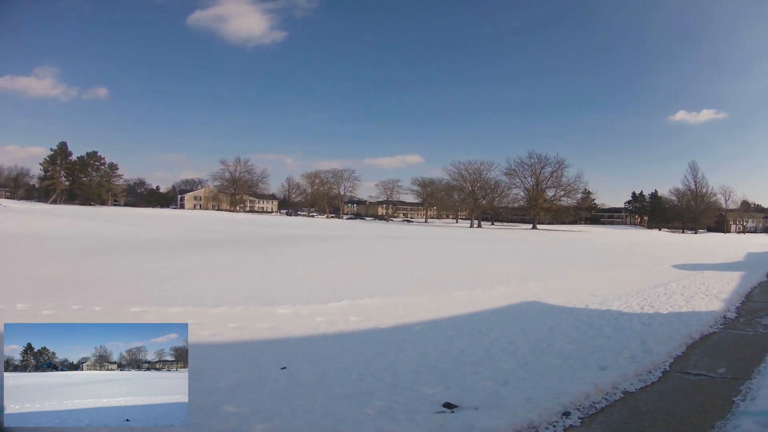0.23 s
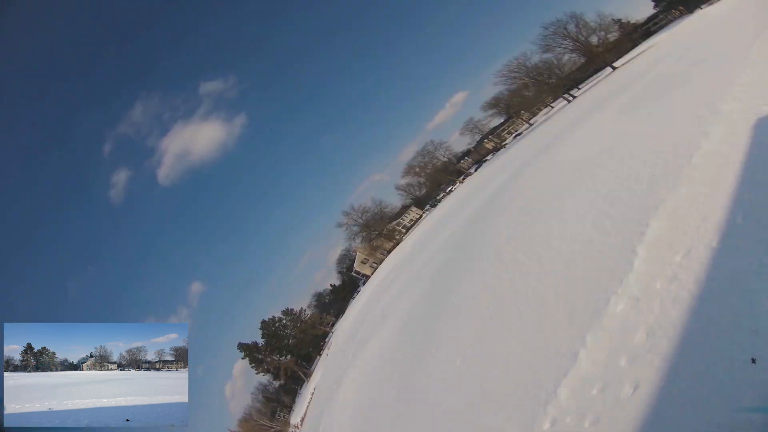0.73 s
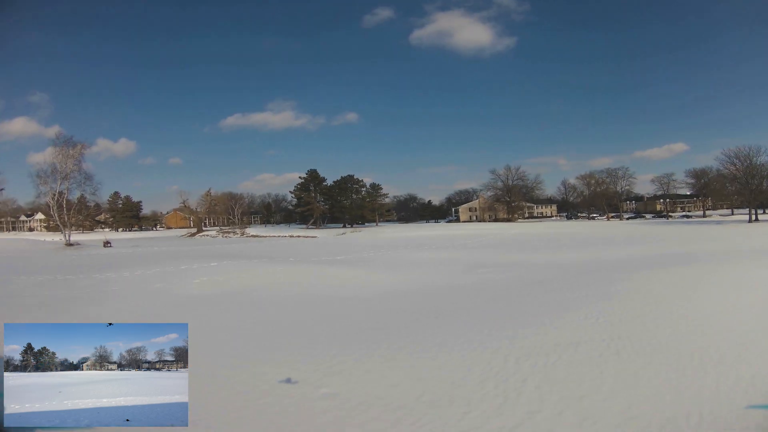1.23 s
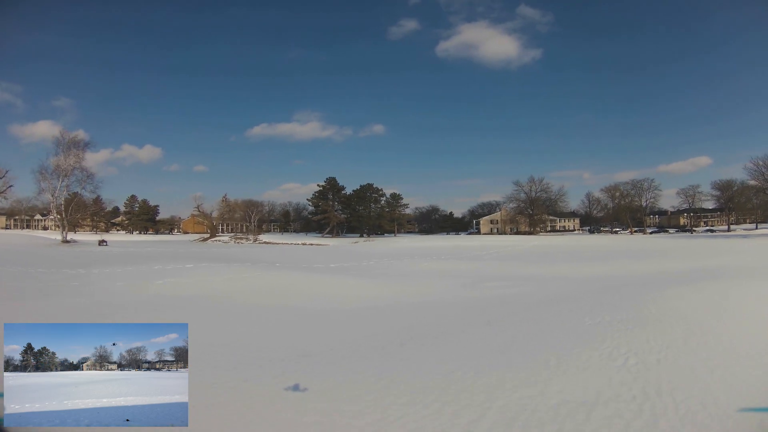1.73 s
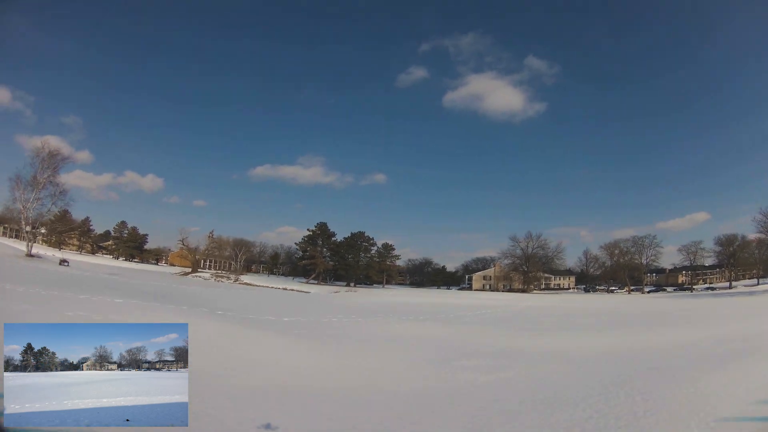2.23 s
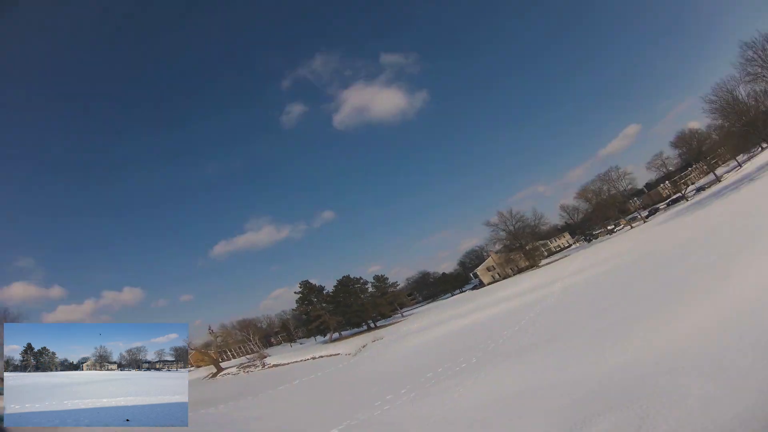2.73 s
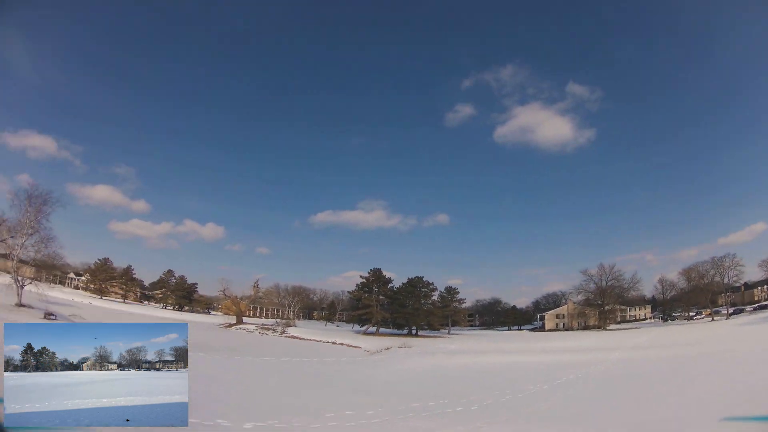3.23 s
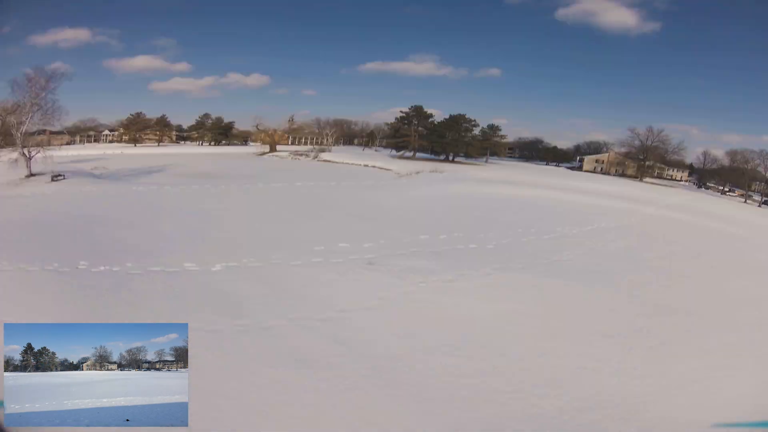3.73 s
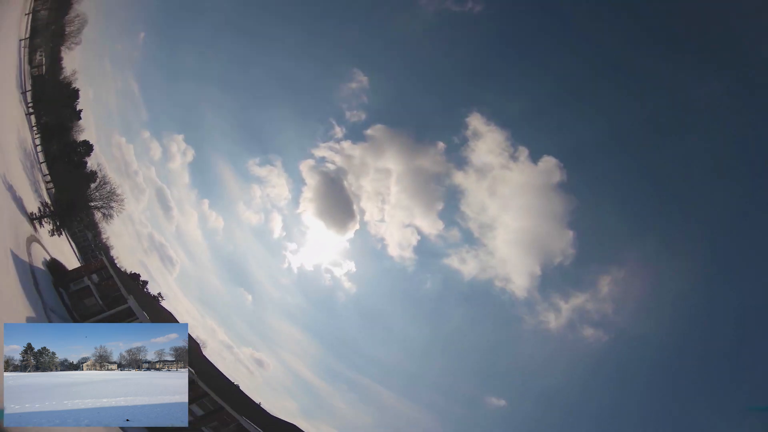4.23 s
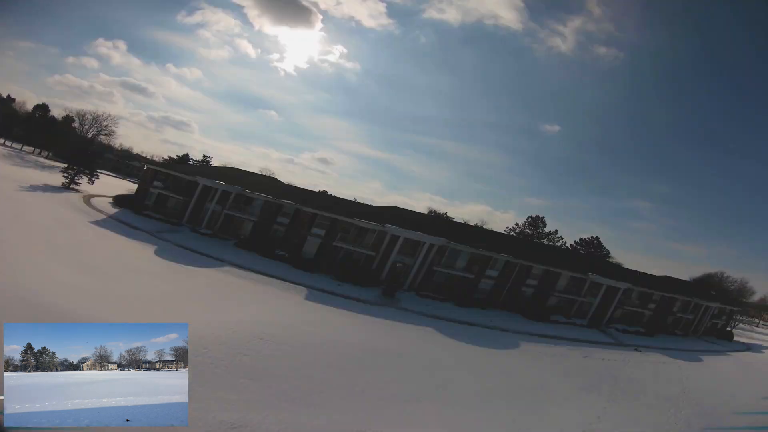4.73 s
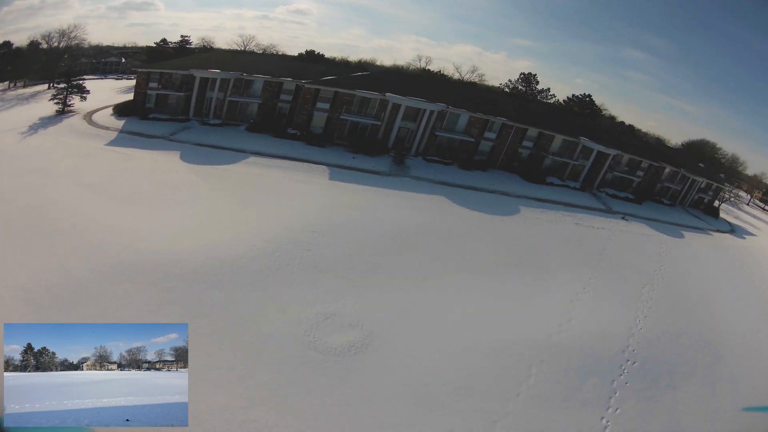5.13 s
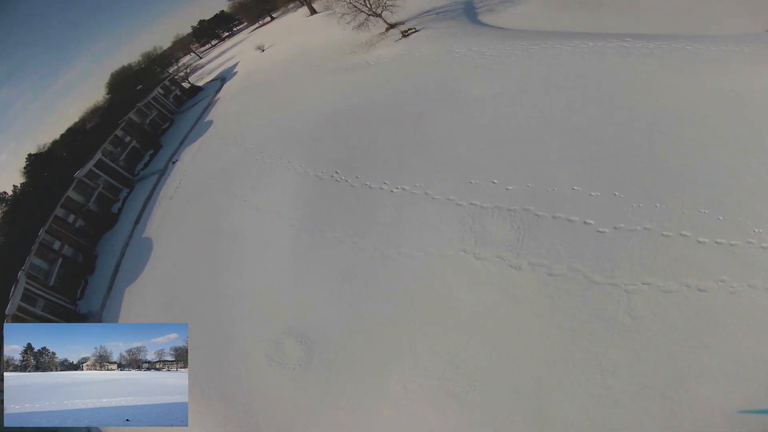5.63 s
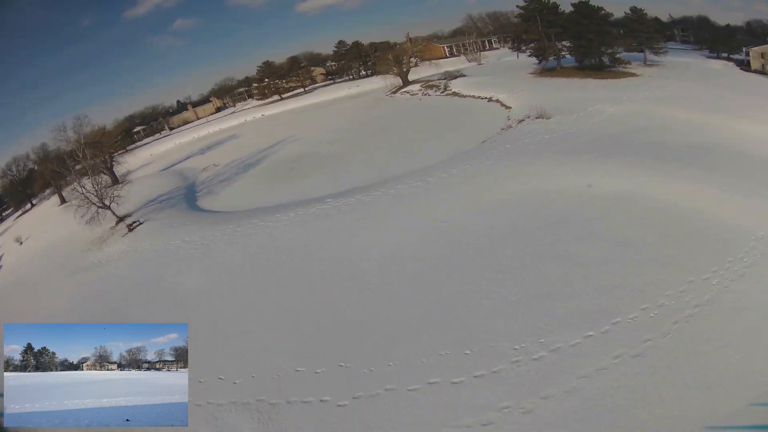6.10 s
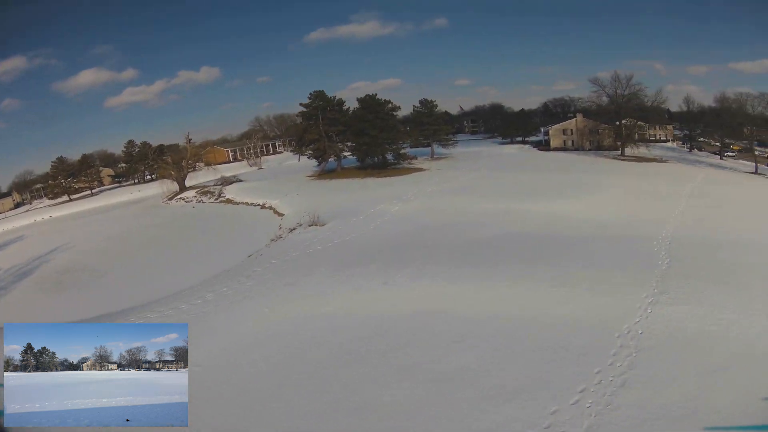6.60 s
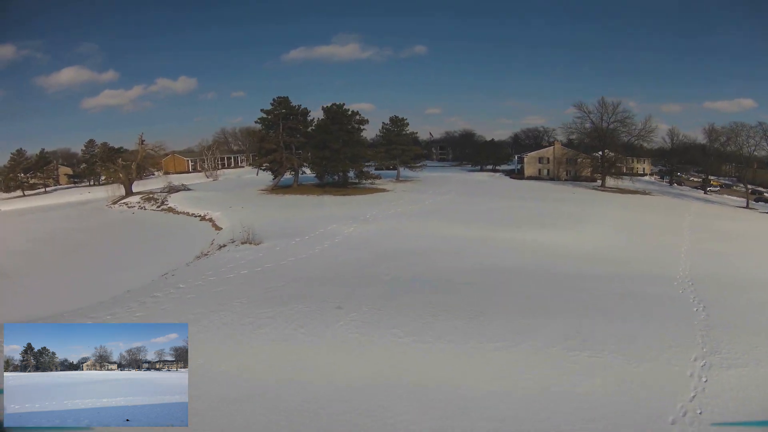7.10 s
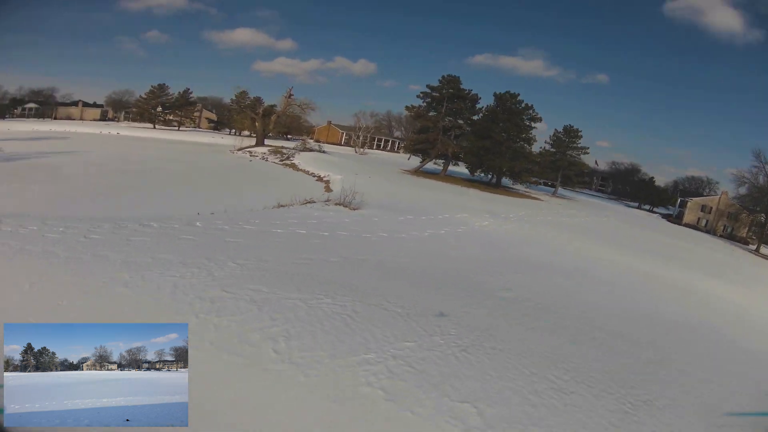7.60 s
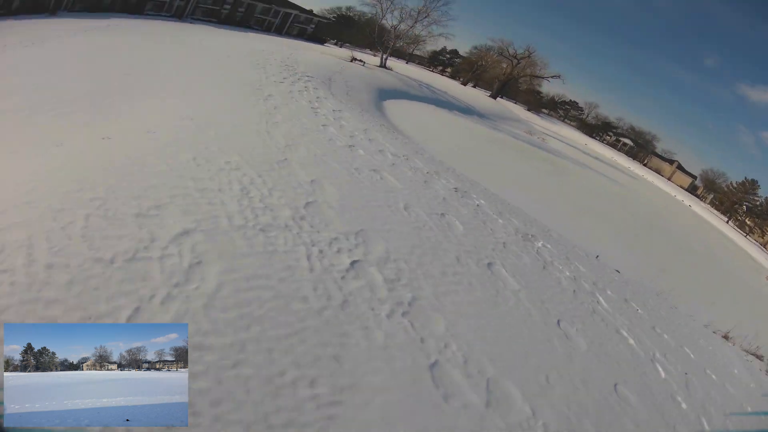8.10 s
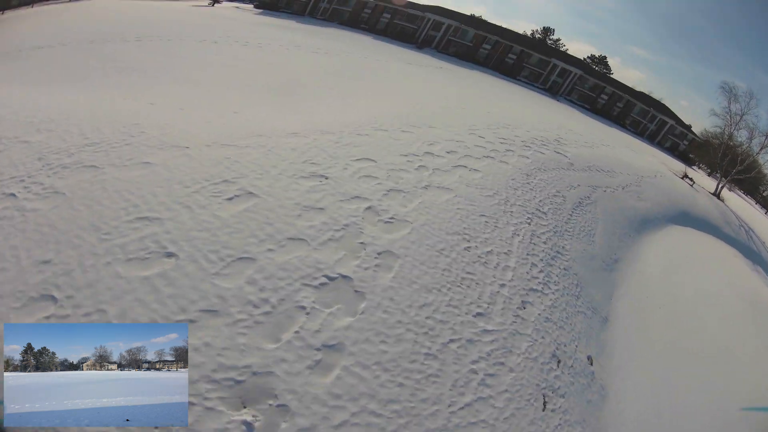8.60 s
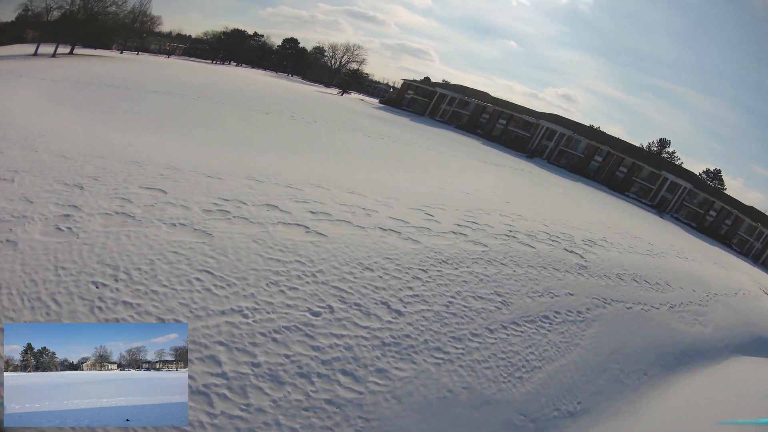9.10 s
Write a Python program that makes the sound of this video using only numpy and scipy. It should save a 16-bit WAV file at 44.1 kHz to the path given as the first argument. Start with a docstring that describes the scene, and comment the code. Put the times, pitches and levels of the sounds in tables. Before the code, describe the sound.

A small racing quadcopter whines and screams in punched throttle bursts over a snowy field, dropping to faint whistling idle between pushes as it flies off.

```python
"""A small racing quadcopter flies over a snowy field, heard from the ground where it took off.
From the start, over a low outdoor wash, four three-blade propellers whine and beat as harmonic series.
The throttle is punched and cut; between punches the idling motors whistle by magnetic pull on their bells.
From 1.3 s brief jabs screech as bell-coloured noise. Near 7 s a far bird chirps in arched pitch glides.
A last long push rises and falls to the end; scattered echoes follow the craft and the bird."""
import sys
import numpy as np
from scipy import signal
from scipy.fft import rfft, irfft, next_fast_len
from scipy.io import wavfile
from scipy.ndimage import uniform_filter1d, map_coordinates

SR = 44100
rng = np.random.default_rng(int(sys.argv[2]) if len(sys.argv) > 2 else 0)


def log_audio(samples):
    """Write samples as a 16-bit WAV file to the path given in sys.argv[1]."""
    # one column per channel
    frames = np.atleast_2d(samples).T
    # limit to full scale, then quantise
    limited = np.clip(frames, -1, 1)
    pcm = np.round(limited * 32767).astype(np.int16)
    wavfile.write(sys.argv[1], SR, pcm)


N = 412323
T = np.arange(N) / SR
FREQS = np.fft.rfftfreq(N, 1 / SR)

IDLE_HZ, LIFT_HZ = 369, 484.7  # blade-passing pitch at idle, and where the blades begin to carry the craft
IDLE_SPREAD = .18  # speed difference between the motors at idle, as a share
# the four motors: place_in_speed_spread, relative_level_db
MOTOR_OFFSETS = [(-1.05, -3.5), (-0.6, -2), (.55, 1.5), (.9, -1)]
# tilt of the propellers beams their sound:
# time_s, blade_tone_db, buzz_db, second_to_first_harmonic_db, higher_overtones_db
TILT_BEAM = [(0, 0.5, -3, -5, -2), (.5, -4, -4.5, -4, 4), (.68, 0, 1.5, 11, -3.5), (.92, 1.5, 0, 1, 1.5),
             (1.02, -1.5, -4.5, 3.5, -3.5), (1.8, -2, 0.5, -0.5, 0), (2.25, -1, -1, -5, -1),
             (2.47, 4, 2, 4.5, -0.5), (3.7, -0.5, -2.5, -3.5, -2), (4, 3.5, 1, 9, -2.5),
             (4.95, 2.5, 1, 2.5, -2.5), (5.15, -1, -6.5, 9.5, -1.5), (6.4, 0, 3, 1, -2),
             (6.8, 2, 1.5, 1, -5), (8.1, 7.5, 0, 0, -1), (8.5, -4, 3.5, -7, -10.5), (8.75, 4.5, 5, 7, -13),
             (9.05, 14.5, 2, 9.5, -6), (9.35, 14, -1.5, 10.5, -4.5)]
# motor jabs that start or stop a flip; levels are those before the attack and decay shape:
# start_s, pitch_gain_hz, screech_db, blade_bite_db, rise_s, decay_s
FLIP_JABS = [(1.296, 249.4, -42.5, -40, 0.0025, 0.037), (2.62, 451.4, -43.5, -46, .002, .011),
             (2.921, 230.3, -40, -41.5, 0.0028, .011), (3.009, 89.96, -63, -62.5, 0.0095, .05),
             (4.254, 451.1, -52, -30.5, .009, .032), (4.439, 50.07, -56.5, -65.5, 0.0057, .035),
             (5.645, 100, -66, -53, 0.0097, 0.059), (5.835, 30.35, -61.5, -73, 0.0055, 0.023)]


def amp(db):
    """Level law: decibels to amplitude gain."""
    return 10 ** (np.asarray(db) / 20)


def unit(x):
    """Normalisation by mean power: scales to rms 1."""
    return x / np.sqrt(np.mean(x ** 2) + 1e-20)


def follow(rows):
    """Linear interpolation in time: the columns of a curve table at every sample."""
    s, *columns = np.transpose(rows)
    return [np.interp(T, s, column) for column in columns]


def across(points):
    """Interpolation over log frequency: a spectral table at every bin."""
    hz, value = np.transpose(points)
    return np.interp(np.log(FREQS + 1), np.log(hz), value)


def drift(rate_hz):
    """Low-pass filtered noise: a smooth random curve of rms 1, up to about the given rate."""
    size = next_fast_len(N)
    hz = np.fft.rfftfreq(size, 1 / SR)
    spectrum = rfft(rng.standard_normal(size)) / (1 + (hz / rate_hz) ** 4)
    return unit(irfft(spectrum, size)[:N])


def noise_pair(spectrum, same):
    """Partial coherence: coloured noise at two microphones with the given correlation."""
    a, b = rfft(rng.standard_normal((2, N)))
    same = np.clip(same, -1, 1)
    pair = np.array([a, same * a + np.sqrt(1 - same ** 2) * b])
    return unit(irfft(pair * amp(across(spectrum)), N))


def load(hz):
    """Motor loading: 0 in cruise, 1 at full throttle."""
    return np.clip((hz - 930) / 200, 0, 1)


def wash(level_db=-56.5, swell_db=0.83, swell_hz=4, rumble_hz=110):
    """Partly coherent ambient noise: distant traffic, and a low rumble that comes and goes with the wind."""
    # spectral shape: frequency_hz, density_db
    wash_spectrum = [(15, -28), (25, 0.5), (71, 5.5), (158, -9.5), (202, -18.5), (286, -11.5), (438, -19.5),
                     (700, -13), (1150, -16.5), (1460, -27), (2500, -30), (3540, -41), (5720, -32),
                     (15000, -79.5)]
    # traffic lies to one side; a negative likeness means opposite phase: frequency_hz, left_right_likeness
    wash_likeness = [(30, .42), (70, .52), (130, .92), (300, .75), (500, -.25), (900, -.68), (1150, -.5),
                     (1500, .1), (2200, .35), (12000, .35)]
    # wind on the microphones: time_s, rumble_gain_db
    wind_curve = [(0, 4), (.7, -0.5), (1.3, 3), (2.2, 0.5), (2.65, 9), (3, -4), (4.5, -3), (5.7, -2),
                  (7, -2), (9.35, 2.5)]
    air = noise_pair(wash_spectrum, across(wash_likeness)) * amp(level_db + swell_db * drift(swell_hz))
    rumble = irfft(rfft(air) / (1 + (FREQS / rumble_hz) ** 4), N)
    return air + rumble * (amp(follow(wind_curve)[0]) - 1)


def throttle(slew_s=.016, brake_s=.026):
    """Rotor inertia and braking: smoothed blade pitch and motor speed difference, in pushes and at idle."""
    # one short curve a push, cut after its last point: time_s, blade_passing_hz
    push_curves = [
        [(0, 556.9), (.47, 507.6), (.55, 540.5), (.62, 610), (.8, 661.7), (.87, 738.8), (.925, 923),
         (.97, 1197), (1.005, 1188)],
        [(1.5, 390.5), (1.65, 508.4), (1.8, 597.9), (1.95, 508.8), (2.1, 448.6)],
        [(2.1, 448.2), (2.25, 575), (2.32, 800), (2.4, 1023), (2.5, 1115), (2.55, 1064), (2.577, 883)],
        [(3.5, 399.2), (3.7, 663.2), (3.85, 888), (4, 1090), (4.068, 1198)],
        [(4.76, 416.6), (4.82, 713), (4.87, 1060), (4.93, 1203), (5.1, 845), (5.2, 705), (5.3, 459.6)],
        [(6, 396.8), (6.15, 607), (6.35, 680.2), (6.6, 659.4), (6.8, 625.6), (7, 477.3), (7.6, 448.7)],
        [(7.6, 450), (7.9, 621), (8.12, 783), (8.3, 916.3), (8.5, 974.6), (8.62, 951.5), (8.75, 816.7),
         (9, 660), (9.35, 585)],
    ]
    # one value a push: speed_difference_share
    push_spreads = [.078, .052, .033, .08, .07, .04, .06]
    hz, spread = np.full(N, float(IDLE_HZ)), np.full(N, float(IDLE_SPREAD))
    for push, share in zip(push_curves, push_spreads):
        start, cut = push[0][0], push[-1][0]
        extra_hz = follow(push)[0] - IDLE_HZ
        outside_s = np.maximum(start - T, 0) + np.maximum(T - cut, 0)
        held = np.exp(-outside_s / brake_s)
        hz = np.maximum(hz, IDLE_HZ + extra_hz * held)
        lift = np.clip(extra_hz / (LIFT_HZ - IDLE_HZ), 0, 1) * held
        spread = np.minimum(spread, IDLE_SPREAD + (share - IDLE_SPREAD) * lift)
    return [uniform_filter1d(curve, max(round(slew_s * SR), 1)) for curve in (hz, spread)]


def motor_pitches(hz, spread, wander=.35, wander_hz=3.5, flutter_hz=35):
    """Detuning makes beats: each motor has its own speed, trimmed all the time to keep the craft level."""
    flutter = .002 + .5 * spread ** 2
    pitches = []
    for offset, _ in MOTOR_OFFSETS:
        detune = spread * (offset + wander * drift(wander_hz))
        pitches.append(hz * (1 + detune + flutter * drift(flutter_hz)))
    return pitches


def levels(hz):
    """Source strength, distance and directivity: tone, buzz and hiss levels in dB, before the mix gains."""
    # loudness grows with speed: blade_passing_hz, blade_tone_db, overtone_buzz_db, tip_hiss_db
    speed_loudness = [(363, -60, -59, -45), (452, -45.5, -43, -39), (642, -38, -35, -33),
                      (810, -33.5, -27, -31), (1010, -20.5, -24, -29), (1265, -18, -16.5, -15)]
    # the craft flies off and comes partly back: time_s, distance_gain_db
    distance_gain = [(0, 1.5), (.55, -1), (1, -4), (1.2, -12), (1.8, -11), (2.2, -13.5), (2.5, -15),
                     (2.85, -18), (3.35, -26.5), (3.75, -22), (4.65, -24.5), (4.9, -20), (5.5, -29.5),
                     (6, -34), (6.4, -23.5), (7.1, -32), (7.75, -33.5), (8.22, -29), (8.5, -20.5),
                     (9.05, -24.5), (9.35, -26.5)]
    speeds, *laws = np.transpose(speed_loudness)
    near_db = follow(distance_gain)[0]
    tone_beam, buzz_beam = follow(TILT_BEAM)[:2]
    tone, buzz, hiss = (np.interp(hz, speeds, law) + near_db for law in laws)
    return tone + tone_beam, buzz + buzz_beam, hiss


def propeller(hz, db, second, upper, slope=0.59, shaft_db=-25, shake_db=-25,
              beat_db=2.5, beat_hz=14, split_hz=1400):
    """Blade-passing harmonics, shared between low tone and buzz, with weak shaft orders from imbalance."""
    fade_db, fade_hz, roll_hz = 4, 3.5, 7500
    angle = 2 * np.pi * (np.cumsum(hz) / SR + rng.random())
    shaft_angle = angle / 3  # three blades pass in each turn

    # the second harmonic belongs to the tone below split_hz and to the buzz above it
    low = 1 / (1 + (2 * hz / split_hz) ** 24)
    second_low, second_high = second * low, second * (1 - low)
    tone = (np.sin(angle) + second_low * np.sin(2 * angle)) / np.sqrt(1 + second_low ** 2)
    # at full speed the unbalanced propeller shakes the frame
    tone += amp(shake_db) * load(hz) * np.sin(shaft_angle)

    # overtones swell and fade at different times as the craft turns
    fade = unit(amp(fade_db * drift(fade_hz)))
    roll = (hz / roll_hz) ** 8
    buzz = second_high * np.sin(2 * angle) / 2
    for k in range(3, 8):
        gain = upper * k ** -slope / (1 + k ** 8 * roll)
        overtone = np.sin(k * angle + 2 * np.pi * rng.random())
        buzz += gain * np.roll(fade, rng.integers(N)) * overtone
    shaft = sum(np.sin(k * shaft_angle + 2 * np.pi * rng.random()) for k in (4, 5, 7, 8, 10))
    buzz = (buzz + amp(shaft_db) * shaft) / np.sqrt(1 + second_high ** 2)

    swell = amp(db + beat_db * drift(beat_hz))
    return tone * swell, buzz * swell[::-1], np.cos(angle)  # reversed, so that tone and buzz swell apart


def blade_wake(speed_hz, clean_rise=1.2):
    """Turbulent wake noise: its share of the buzz level falls as the blades speed up."""
    # spectral shape: frequency_hz, density_db
    wake_spectrum = [(100, -31), (300, -10.5), (800, -46.5), (1100, -5), (1500, 4.5), (2200, -1),
                     (3300, 5.5), (4300, -2), (6500, -62), (9000, -17)]
    cleaner = (np.maximum(speed_hz, LIFT_HZ) / 600) ** -clean_rise
    return noise_pair(wake_spectrum, same=0.15) * cleaner


def thinned(hiss, hiss_db, full_db=-50, loss=0.7, split_hz=8600):
    """Level-dependent treble: the quieter the hiss below full_db, the duller it sounds above split_hz."""
    top = irfft(rfft(hiss) / (1 + (split_hz / (FREQS + 1)) ** 16), N)
    return hiss + top * (amp(loss * np.minimum(hiss_db - full_db, 0)) - 1)


def tip_hiss(hz, heard_db, idle_dull_db=-7.5):
    """Tip turbulence: broadband noise that sounds duller at the top when it is quiet or the motors idle."""
    # spectral shape: frequency_hz, density_db
    tip_spectrum = [(1500, -17.5), (3200, -16.5), (4500, -0.5), (6000, 3), (7900, 4.5), (8700, -17.5),
                    (9700, -14.5), (11500, -5), (13500, 0), (16800, -4.5)]
    dull_db = idle_dull_db * np.clip((LIFT_HZ - hz) / (LIFT_HZ - IDLE_HZ), 0, 1)
    return thinned(noise_pair(tip_spectrum, same=0.41), heard_db + dull_db)


def bell(hz, between_db=-20):
    """Resonance curves: gain of the motor bell over frequency, above a floor."""
    # centre_hz, width_hz, peak_db
    bell_modes = [(4500, 400, 0), (5750, 450, 0), (7650, 500, 1)]
    return amp(between_db) + sum(amp(db) / (1 + (2 * (hz - f) / width) ** 2) for f, width, db in bell_modes)


def whistle(hz, load_db=17):
    """Magnetic pull on the motor bell: lines that flare in its resonances, and harder under load."""
    # 14 poles and 42 commutations a turn: multiple_of_shaft_speed, relative_level_db
    magnet_orders = [(14, 0), (42, -1), (84, -8)]
    shaft_hz = hz / 3
    angle, out = 2 * np.pi * np.cumsum(shaft_hz) / SR, np.zeros(N)
    for order, db in magnet_orders:
        line_hz = order * shaft_hz
        treble_fade = np.clip((9000 - line_hz) / 1000, 0, 1)
        out += amp(db) * bell(line_hz) * treble_fade * np.sin(order * angle)
    return out * amp(load_db * load(hz))


def screech():
    """Forced resonance: abrupt drive current, as noise, rattles the motor bells."""
    spectrum = rfft(rng.standard_normal((2, N))) * bell(FREQS)
    return unit(irfft(spectrum / (1 + (FREQS / 8500) ** 16), N))


def jab_pitch(peak_decays=1.1):
    """Transient acceleration: each jab throws the blade pitch up, peaking after peak_decays decay times."""
    out = np.zeros(N)
    for s, gain_hz, *_, decay in FLIP_JABS:
        u = np.clip((T - s) / (peak_decays * decay), 0, 20)
        out += gain_hz * (u * np.exp(1 - u)) ** 2
    return out


def jabs(bite_delay_s=0.0093, bite_slowness=3, settle_db=-18, settle_s=0.088):
    """Attack and decay envelopes: motors screech first and chatter on as the craft settles; blades bite later."""
    rasp, bite, age = np.zeros(N), np.zeros(N), np.arange(SR) / SR
    for s, _, rasp_db, bite_db, rise, decay in FLIP_JABS:
        fall = np.exp(-age / decay)
        chatter = amp(settle_db) * np.exp(-age / settle_s)
        rasp_attack = (1 - np.exp(-age / rise)) ** 2
        bite_attack = (1 - np.exp(-age / (rise * bite_slowness))) ** 2
        rasp[round(s * SR):][:SR] += amp(rasp_db) * rasp_attack * (fall ** 1.4 + chatter)
        bite[round((s + bite_delay_s) * SR):][:SR] += amp(bite_db) * bite_attack * fall
    return rasp, bite


def drone(tone_db=-1, hiss_db=-2, buzz_db=-1, wake_db=-4, chop=0.4, screech_db=4, rattle_db=-12,
          whistle_db=-40, hiss_bite_db=-1, hiss_rasp_db=-5, clean_db=-2.5, whistle_follow=.48):
    """Superposition of four propellers and motors; the tones outgrow the noise as the speed rises."""
    throttle_hz, spread = throttle()
    jabbed_hz = throttle_hz + jab_pitch()
    rasp, bite = jabs()
    tone_level = levels(jabbed_hz)[0]
    _, buzz_level, hiss_level = levels(throttle_hz)
    buzz_gain = amp(buzz_level) + bite
    hiss_gain = amp(hiss_level) + amp(hiss_bite_db) * bite + amp(hiss_rasp_db) * rasp
    heard_db = 20 * np.log10(hiss_gain)

    pitches = motor_pitches(jabbed_hz, spread)
    speed_hz = np.mean(pitches, 0)
    second, upper = amp(follow(TILT_BEAM)[2:])
    propellers = [propeller(hz, db, second, upper) for hz, (_, db) in zip(pitches, MOTOR_OFFSETS)]
    tone, buzz, blades = (unit(sum(part)) for part in zip(*propellers))
    tone = tone * np.minimum(speed_hz / LIFT_HZ, 1) ** 5  # idling blades carry no thrust and hardly hum
    tones = tone * amp(tone_level + tone_db) + buzz * buzz_gain * amp(buzz_db)

    wake = blade_wake(speed_hz) * buzz_gain * amp(wake_db)
    hiss = tip_hiss(jabbed_hz, heard_db) * hiss_gain * amp(hiss_db + clean_db * load(speed_hz))
    chopped_noise = (wake + hiss) * (1 + chop * blades)  # pulses at the blade-passing rate
    whistles = sum(map(whistle, pitches)) * amp(whistle_db + whistle_follow * heard_db)
    # the bells also rattle faintly whenever the motors run
    bells = screech() * (amp(screech_db) * rasp + amp(rattle_db) * hiss_gain)
    return tones + whistles + bells + chopped_noise


def place(x):
    """Interaural time and level differences: direction delays and shades one microphone against the other."""
    # direction of the craft: time_s, left_lead_ms, left_right_db
    bearing = [(0, 0.24, 6.5), (.95, -0.016, 3), (1.8, -0.048, 2), (2.4, -0.066, 1.5), (3.8, 0.0093, 4),
               (4.9, 0.055, 4.5), (6.4, -0.022, 2.5), (7.8, 0.049, 7), (8.5, 0.082, 4.5), (9.35, .17, 5)]
    lead_ms, side_db = follow(bearing)
    shift = lead_ms * SR / 1000 / 2  # samples, half for each microphone
    sides = []
    for channel, sign in zip(x, (1, -1)):
        moved = map_coordinates(channel, [np.arange(N) + sign * shift], order=3)
        sides.append(moved * amp(sign * side_db / 2))
    return np.array(sides)


def bird():
    """Frequency modulation: short arched chirps, some of them raspy through random pitch shake."""
    # chirps: start_s, length_s, start_hz, middle_hz, end_hz, level_db (before 7 dB of gain), rasp_share
    chirp_rows = [(6.914, 0.055, 3685, 4400, 4385, -66.5, 0.047),
                  (6.932, 0.085, 3100, 3010, 2280, -69, 0.015), (7.205, 0.0458, 2277, 2810, 2785, -65, .08),
                  (7.282, 0.045, 2380, 2690, 2540, -65, 0.066)]
    out, shake = np.zeros(N), drift(rate_hz=410)
    for s, length, start_hz, middle_hz, end_hz, db, rasp in chirp_rows:
        u = np.clip((T - s) / length, 0, 1)
        # a parabola through the three pitches
        hz = start_hz * (1 - u) * (1 - 2 * u) + middle_hz * 4 * u * (1 - u) + end_hz * u * (2 * u - 1)
        angle = 2 * np.pi * np.cumsum(hz * (1 + rasp * shake)) / SR
        out += amp(db + 7) * np.sin(np.pi * u) * np.sin(angle)
    return out


def echoes(x, near_db=-9, near_decay=0.013, far_db=-28, far_decay=0.084):
    """Scattering as sparse impulses: ground and wall close by, and a faint return from houses and trees."""
    t = np.arange(SR // 2) / SR
    signs = rng.choice([-1., 1.], (2, 2, len(t)))
    near, far = signs * (rng.random((2, 2, len(t))) < .05) * (t > .001)
    near = near * np.exp(-t / near_decay)
    far = signal.lfilter([1], [1, -.7], far) * np.exp(-t / far_decay)  # the far return is duller
    taps = sum(amp(db) * h / np.linalg.norm(h, axis=1, keepdims=True)
               for db, h in ((near_db, near), (far_db, far)))
    return signal.fftconvolve(x, taps, axes=1)[:, :N]


def scene():
    """Superposition: the craft and the bird with their echoes, over the wash."""
    direct = place(drone()) + bird()
    return direct + echoes(direct) + wash()


def record(dry, edge_hz=15900):
    """Frequency response: two unlike microphones, the right one brighter, then a low-pass band limit."""
    # frequency_hz, left_right_db
    port_tilt = [(4400, -1), (6500, -2), (8100, -3), (10000, -13), (15000, -14.5)]
    tilt_db = across(port_tilt) * np.array([[.5], [-.5]])
    coloured = irfft(rfft(dry) * amp(tilt_db), N)
    low_pass = signal.firwin(511, edge_hz, window=("kaiser", 9), fs=SR)
    return signal.oaconvolve(coloured, low_pass[None], "same")


dry = scene()
out = record(dry)
log_audio(out)
```